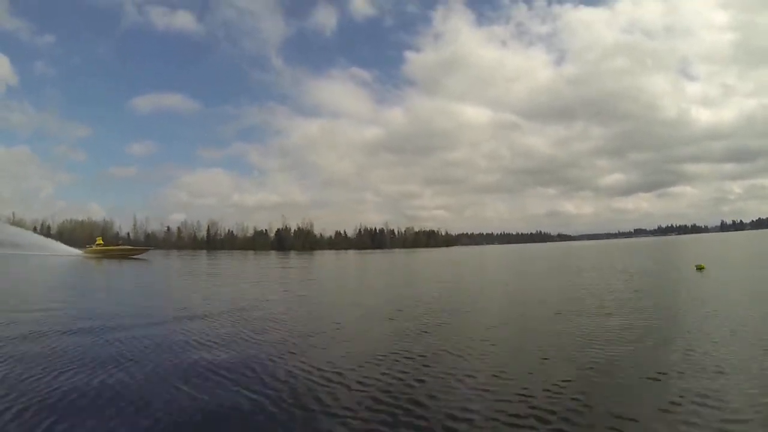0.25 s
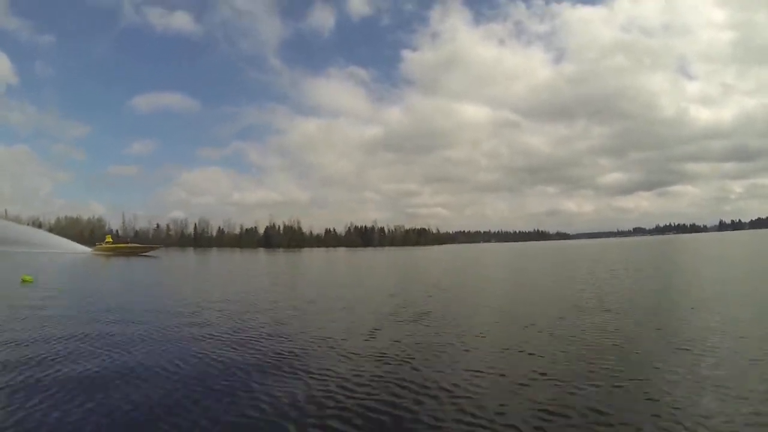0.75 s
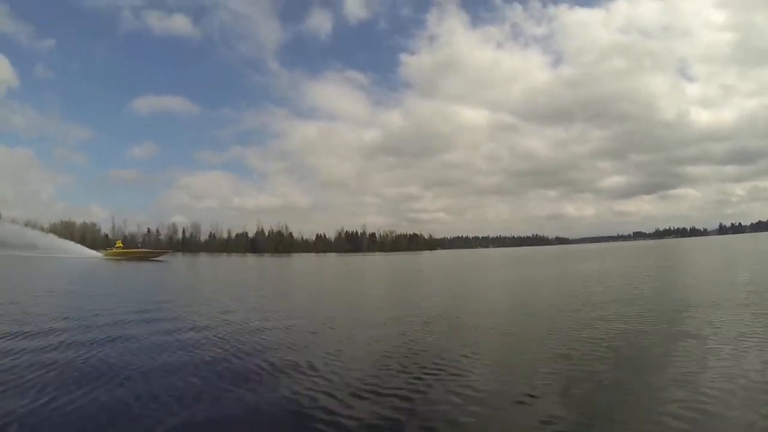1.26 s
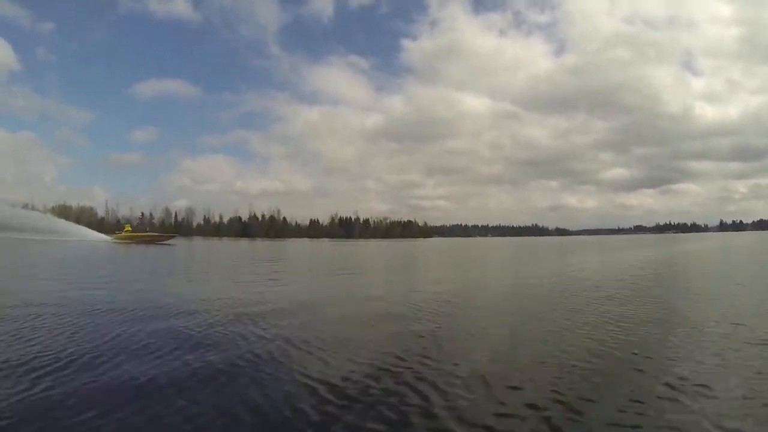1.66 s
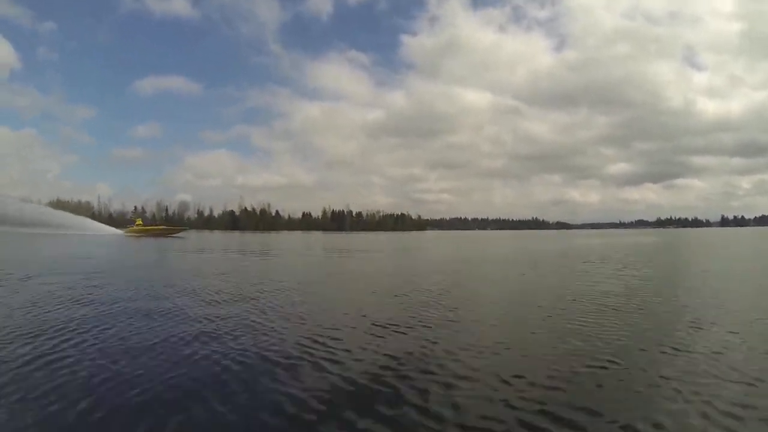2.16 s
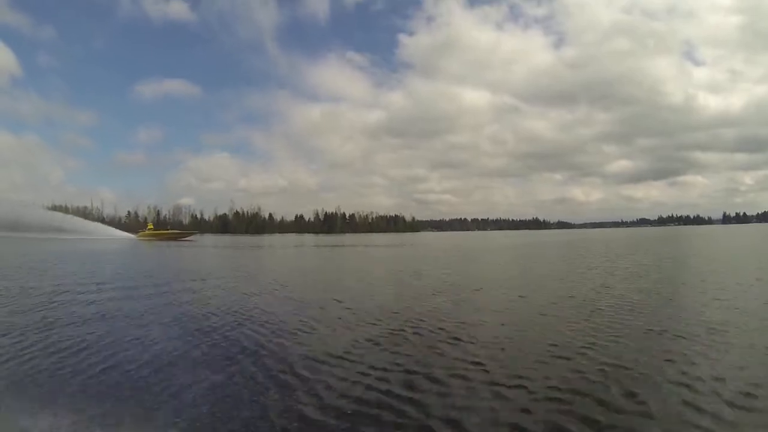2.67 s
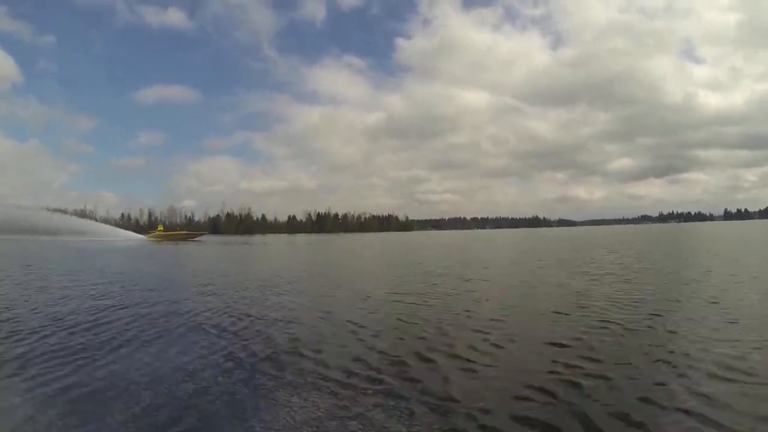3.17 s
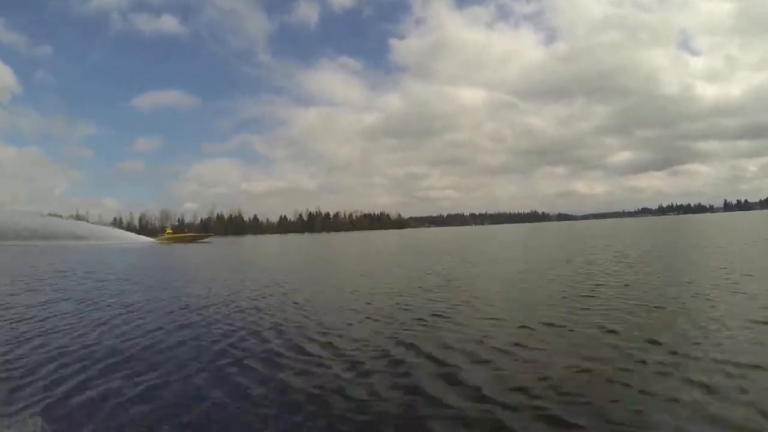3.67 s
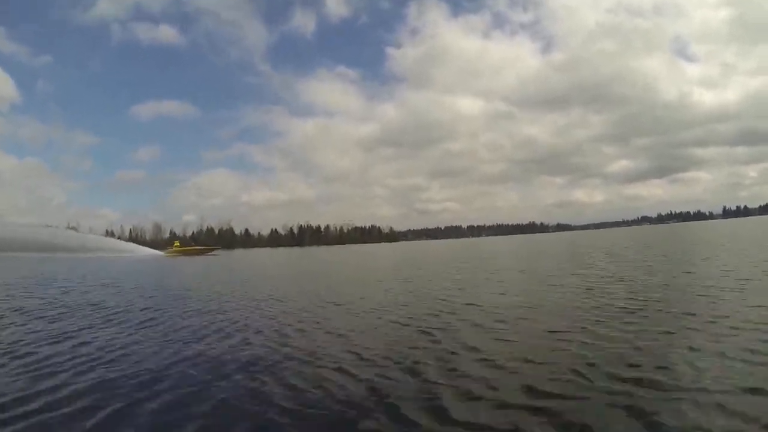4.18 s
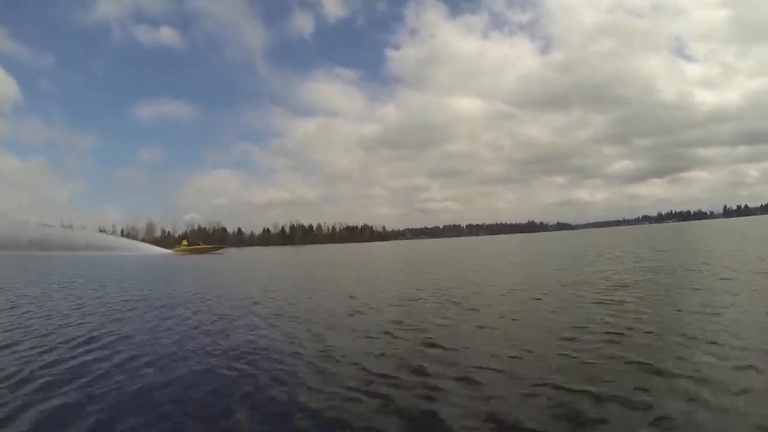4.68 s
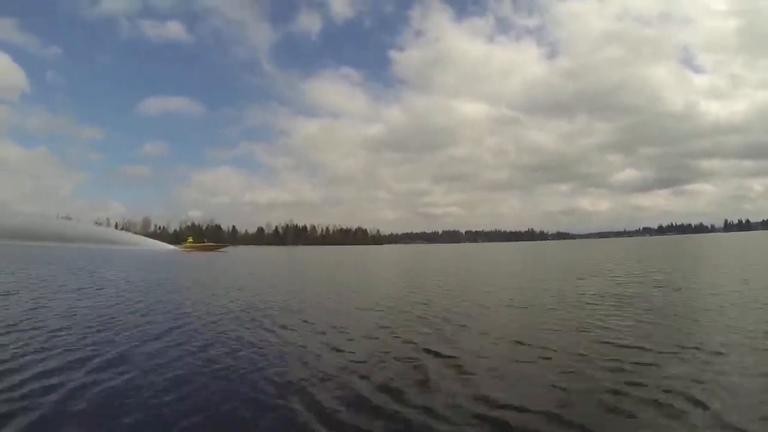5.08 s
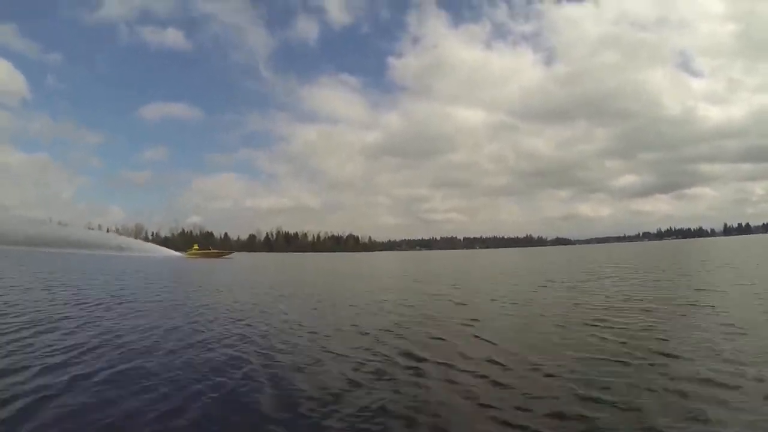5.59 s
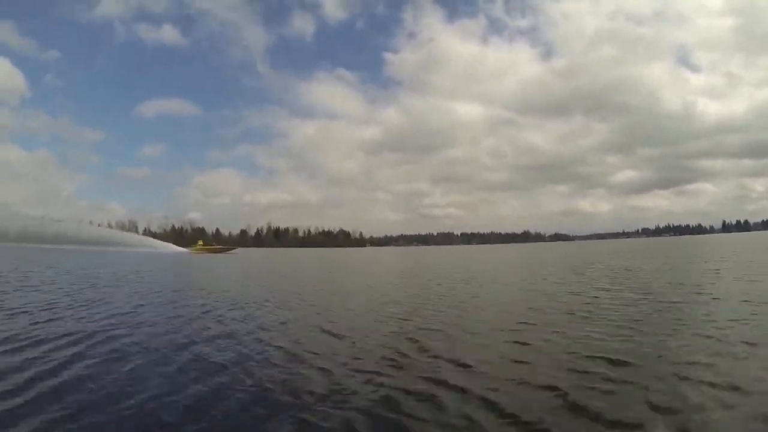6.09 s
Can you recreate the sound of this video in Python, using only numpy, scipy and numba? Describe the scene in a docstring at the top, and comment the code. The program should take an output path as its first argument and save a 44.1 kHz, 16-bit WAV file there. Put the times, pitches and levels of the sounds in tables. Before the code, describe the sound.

Aboard a fast boat on open water, a big engine holds one steady low drone, its raspy exhaust note wavering. Muffled water rushes beneath, swelling about twice a second as the hull bounces, with faint spray hiss. Low wind rumbles against the microphone's closed housing, and scattered hard gusts thump, briefly pushing everything else down.

```python
"""Jet boat at steady throttle

A V8 jet boat planes across a lake, heard by a small camera in a closed housing on board. Sine orders of the engine
cycle and resonant gas puffs make the drone; coloured noise makes the rushing water, spray and buffeting wind.
The hull bounces about twice a second: water and spray surge, and a loose fitting chatters in between.
Hard gusts thump and tick on the housing, and the loudest peaks make the gain control duck."""
import sys
import numpy as np
from scipy import signal
from scipy.fft import rfft, irfft, next_fast_len
from scipy.io import wavfile
from scipy.ndimage import uniform_filter1d
from numba import njit

SR = 44100
rng = np.random.default_rng(int(sys.argv[2]) if len(sys.argv) > 2 else 0)


def ratio(d):
    """dB to gain"""
    e = np.asarray(d, float) / 20
    return 10 ** e


def generate_wav(sig):
    """Save sig (samples, or channels by samples) to the path in sys.argv[1] as 16-bit PCM at SR."""
    pcm = np.round(np.clip(np.atleast_2d(sig).T, -1, 1) * 32767).astype(np.int16)
    wavfile.write(sys.argv[1], SR, pcm)


N = 279594
TIME = np.arange(N) / SR  # seconds

# Mean engine cycle rate, one cycle being two crank turns. Each row: time in seconds, rate in Hz.
CYCLE_RATE = [(0, 37.65), (2, 37.52), (3.5, 37.97), (5, 37.91), (6.34, 37.8)]
# Engine orders; 2 is the crank turn, 8 the firing. 1 and 4-6 hold a steady mean, the others ride on the curves below.
# Each row: multiple of the cycle rate, level in dB before a common lift.
ENGINE_ORDERS = [(1, -44), (2, 1.5), (3, -0.5), (4, -45), (5, -45.5), (6, -57.5), (7, -15.5), (8, 1),
                 (9, -11), (14, -14), (16, -9), (17, -12), (18, -5), (22, -14.5)]
# Exhaust pipe resonances, the main one first. Each row: centre in Hz, width in Hz, level in dB against its curve.
PIPE_RESONANCES = [(312.8, 39, -5), (653.5, 56, -4), (679, 100, -10.5), (853, 46, -10.5)]
# Levels of the low orders. Each row: time in seconds, throb (order 3) in dB, crank (order 2) in dB.
LOW_ORDER_LEVELS = [(0.03, -41, -38), (0.12, -40, -28), (0.47, -43, -45), (0.53, -36, -34.5), (0.66, -39, -27.5),
                    (0.8, -31, -39), (0.94, -41.5, -34), (1.02, -36.5, -43), (1.15, -41, -34.5),
                    (1.18, -40.5, -29), (1.43, -41, -34.5), (1.85, -35, -35.5), (1.92, -49.5, -32),
                    (2.05, -33, -36), (2.16, -45.5, -44), (2.35, -47, -27.5), (2.68, -43, -43), (2.79, -37, -29),
                    (2.88, -38, -46), (2.96, -34, -34), (3.12, -36, -41), (3.17, -41, -40), (3.31, -32.5, -35.5),
                    (3.57, -42, -28), (3.75, -52, -42), (3.89, -39, -27), (3.99, -47, -43), (4.1, -26, -32),
                    (4.19, -46, -36), (4.57, -33, -34.5), (4.64, -43, -27.5), (4.75, -36, -26), (4.8, -56, -57),
                    (4.83, -46, -42), (4.92, -36.5, -33.5), (5.2, -28.5, -38), (5.29, -56.5, -36),
                    (5.35, -35, -39), (5.44, -36.5, -31.5), (5.83, -46, -49), (5.91, -39, -35), (6.18, -35, -34),
                    (6.25, -37, -24.5), (6.3, -41, -42)]
# The firing note comes and goes as the outlet dips in and out of the wake. Each row: time in seconds, level in dB.
FIRING_LEVEL = [(0.03, -50), (0.06, -33.5), (0.47, -43), (0.62, -33.5), (0.64, -38), (0.78, -34),
                (0.82, -38.5), (1.04, -39), (1.08, -34), (1.29, -37), (1.32, -46), (1.36, -42), (1.53, -48),
                (1.74, -32), (1.81, -39.5), (1.95, -35.5), (2.0, -49.5), (2.11, -38), (2.12, -33.5),
                (2.37, -32.5), (2.46, -41.5), (2.51, -34), (2.54, -44), (2.61, -38.5), (2.65, -45.5),
                (2.82, -31), (3.15, -45.5), (3.17, -49.5), (3.4, -33.5), (3.49, -40), (3.68, -43.5),
                (3.96, -33), (4.01, -55), (4.05, -35), (4.12, -45), (4.15, -31.5), (4.26, -54), (4.29, -32),
                (4.38, -41), (4.48, -30.5), (4.76, -49), (4.82, -32), (4.85, -50), (4.88, -35.5),
                (4.95, -34), (5.01, -35.5), (5.08, -32.5), (5.11, -49), (5.15, -37), (5.34, -45),
                (5.53, -35.5), (5.91, -45.5), (6.0, -36.5), (6.3, -39)]
# Its overtones flare on their own. Each row: time in seconds, level in dB.
OVERTONE_LEVEL = [(0.03, -46), (0.13, -44.5), (0.17, -53), (0.24, -45), (0.36, -54), (0.59, -42),
                  (0.67, -48), (0.83, -42), (0.85, -47.5), (1.34, -47), (1.43, -54), (1.44, -50),
                  (1.58, -51), (1.62, -44), (1.72, -49), (1.79, -39.5), (1.85, -48), (1.95, -45.5),
                  (2.0, -51), (2.11, -48.5), (2.46, -44), (2.56, -58), (2.72, -47), (2.96, -45),
                  (3.19, -61), (3.3, -42.5), (3.68, -58), (3.89, -42.5), (3.9, -49), (4.06, -45),
                  (4.17, -57), (4.34, -46), (4.53, -47.5), (4.62, -45), (4.73, -57), (4.75, -59),
                  (4.92, -44.5), (4.95, -54), (5.02, -42), (5.08, -49), (5.11, -44.5), (5.29, -61),
                  (5.3, -49), (5.46, -46), (5.51, -48), (5.81, -52), (6.02, -44.5), (6.3, -56.5)]
# Crests of the hull's bounces. Each row: time in seconds, rushing water in dB, spray in dB, both before surges.
BOUNCE_CRESTS = [(-.4, -40, -43), (.1, -44.5, -58.5), (.62, -45.5, -58), (1.17, -45, -57.5),
                 (1.721, -44.5, -57.5), (2.251, -41.5, -55), (2.8, -45, -58.5), (3.361, -43.5, -57),
                 (3.9, -47, -58), (4.47, -43.5, -58.5), (5.001, -44.5, -58.5), (5.48, -46.5, -60.5),
                 (6.002, -43, -57), (6.55, -49, -63)]
# How deep the hull drops back after each crest. Each row: time in seconds, share of the sag depth.
DROP_SHARES = [(0, 1.1), (.4, 0.98), (.9, 0.63), (1.45, 1.39), (2.0, 0.52), (2.55, 0.85), (3.15, 1),
               (3.65, 1.3), (4.2, 0.82), (4.75, 0.66), (5.27, 0.71), (5.78, 0.52), (6.34, 1.1)]
# Short surges and lulls as the hull meets or clears a wave.
# Each row: middle in seconds, length at half height in seconds, water change in dB, spray change in dB.
WAVE_SURGES = [(0.862, 0.21, 1, 1.5), (1.084, 0.097, 3.5, 2.5), (1.294, 0.12, 3.5, 1.5),
               (2.187, 0.25, -4, -2.5), (2.43, 0.12, 1, 2), (2.587, 0.17, -4, -2.5), (2.716, .16, 2, 2.5),
               (2.98, 0.11, 1.5, 0.5), (3.2, 0.12, -6, -3.5), (3.3, .08, -1.5, -1), (3.86, 0.15, 3, 2.5),
               (3.93, 0.046, 1.5, -1), (4.053, 0.11, 5.5, 2.5), (4.16, 0.096, 0, -0.5), (4.457, 0.1, 1, 0),
               (4.816, 0.073, -0.5, 0.5), (5.105, 0.023, 2.5, 0), (5.19, .12, 1, 0.5), (5.427, 0.095, 3, 2),
               (5.907, 0.15, -3.5, -1.5), (6.044, 0.049, 2.5, 1), (6.224, 0.055, 3.5, 3)]
# Colour of the rushing water. Each row: frequency in Hz, relative density in dB per Hz.
WATER_COLOUR = [(250, -8.5), (500, 0.5), (800, -2.5), (1000, -5), (1170, -0.5), (1400, -2), (1750, -1.5),
                (2000, -20.5), (2600, -22)]
# Colour of the spray. Each row: frequency in Hz, relative density in dB per Hz.
SPRAY_COLOUR = [(1200, -29), (1900, -1), (2270, -10), (2700, -6), (3600, -10), (4250, -14.5), (4750, -15),
                (7150, -27.5), (10500, -31.5), (11200, -32), (12800, -35.5), (13300, -36.5), (13850, -28),
                (14200, -33.5), (14550, -46)]
# Modes of the housing's shell. Each row: centre in Hz, width in Hz, level in dB against the spray.
SHELL_MODES = [(3625, 86, -19), (4380, 82, -30), (6385, 45, -35.5), (6640, 50, -36), (8450, 200, -36)]
# Colour of the wind. Each row: frequency in Hz, relative density in dB per Hz.
WIND_COLOUR = [(12, 4), (30, 3), (60, 0.5), (120, -3.5), (250, -9.5), (360, -15), (480, -29.5),
               (800, -34.5), (2000, -60.5)]
# Wind on the housing. Each row: time in seconds, gain in dB.
WIND_GUSTS = [(0, -27.5), (.6, -28.5), (1.05, -26), (1.6, -28.5), (2.2, -28), (2.85, -28), (3.3, -31.5),
              (3.9, -27), (4.5, -28), (5.0, -28.5), (5.5, -28), (6.0, -26), (6.34, -29)]
# Hard gusts. Each row: time in seconds, peak in dB, push (+1) or suction (-1), length in seconds.
HARD_GUSTS = [(0.642, -13, 1, 0.009), (1.331, -18, 1, 0.0069), (1.979, -6.5, -1, 0.008),
              (2.483, -16.5, 1, 0.0089), (2.545, -14, -1, 0.0096), (2.790, -16, -1, 0.0035),
              (3.007, -18.5, -1, 0.0055), (3.101, -17, -1, 0.0045), (3.16, -17.5, 1, 0.0094),
              (3.457, -12.5, -1, 0.0053), (3.618, -14, 1, 0.004), (4.045, -15.5, 1, 0.0029),
              (4.423, -14, -1, 0.0028), (4.655, -17, 1, 0.0041), (4.727, -7, -1, 0.0068),
              (4.962, -15.5, -1, 0.0057), (5.254, -10.5, -1, 0.0063), (5.688, -16, 1, 0.014),
              (6.117, -16, -1, 0.0057)]
# Swells of chatter. Each row: middle in seconds, length in seconds, lowest mode in dB, other modes in dB.
CHATTER_SWELLS = [(0.312, 0.3, -83, -81), (0.842, 0.3, -73, -76.5), (1.382, 0.44, -89, -86),
                  (1.92, 0.26, -73, -80), (2.5, 0.24, -79, -84), (3.028, 0.34, -82, -76.5),
                  (3.543, 0.56, -78, -85), (4.1, 0.41, -79, -78), (4.618, 0.56, -76, -79.5),
                  (5.16, 0.41, -79, -80.5), (5.715, 0.59, -84, -80), (6.218, 0.71, -88, -82)]
# Modes of the loose fitting. Each row: frequency at rest in Hz, level in dB against the swell, t60 in seconds.
FITTING_MODES = [(9290, -8, .018), (9530, -2, .02), (9760, -4, .018), (9740, 0.5, .018)]
# Colour of the camera's hiss. Each row: frequency in Hz, relative density in dB per Hz.
HISS_COLOUR = [(3000, -3), (6000, 4.5), (10000, 1), (14600, -5)]


def curves(table):
    """Linear interpolation: the columns of a table at every sample."""
    s, *columns = np.transpose(table)
    return [np.interp(TIME, s, c) for c in columns]


def unit(x):
    """Normalization to rms 1."""
    return x / np.sqrt(np.mean(x ** 2))


def walk(rate):
    """Smoothed random steps: levels held 1 / rate seconds and slewed twice, with rms 1."""
    k = int(SR / rate)
    steps = np.repeat(rng.standard_normal(N // k + 1), k)
    return unit(uniform_filter1d(uniform_filter1d(steps, k), k)[:N])


def turbulence(spectrum, shared_db, own_db, rate):
    """Modulated noise: half-octave bands of one colour all follow shared_db and each also flutters alone."""
    hz, db = np.transpose(spectrum)
    size = next_fast_len(N)
    octave = np.log2(np.maximum(np.fft.rfftfreq(size, 1 / SR), 1))
    gain = ratio(np.interp(octave, np.log2(hz), db, left=-150, right=-150))
    coloured = gain * rfft(rng.standard_normal(size))
    out = 0
    for centre in np.arange(np.log2(hz[0]), np.log2(hz[-1]) + .5, .5):
        band = irfft(coloured * np.clip(1 - 2 * abs(octave - centre), 0, 1), size)[:N]
        out = out + band * ratio(own_db * walk(rate))
    return unit(out * ratio(shared_db))


def ring(x, hz, width_hz):
    """Two-pole resonance with gain 1 at its centre."""
    return signal.lfilter(*signal.iirpeak(hz, hz / width_hz, SR), x)


def engine():
    """Harmonic orders of a periodic source: the low ones rise and fall on their own curves, the rest leave by
    the resonant exhaust."""
    phase = np.cumsum(curves(CYCLE_RATE)[0] * (1 + .002 * walk(6))) / SR  # in cycles
    throb_db, crank_db = curves(LOW_ORDER_LEVELS)
    # water washing over the outlet breaks the exhaust into uneven bursts
    note_db = curves(FIRING_LEVEL)[0] + 1.5 * walk(28)
    overtones_db = curves(OVERTONE_LEVEL)[0] + 1.6 * walk(30)
    lift_db = 1.83
    out = 0
    for multiple, db in ENGINE_ORDERS:
        if multiple == 2:
            carrier_db = crank_db
        elif multiple == 3:
            carrier_db = throb_db
        elif multiple < 7:
            carrier_db = 0
        else:
            carrier_db = note_db if multiple < 10 else overtones_db
        # uneven burns let each order waver on its own
        level = ratio(lift_db + db + carrier_db + 1.0 * walk(7.6))
        jitter = (0.054 + 0.041 * multiple) * walk(14)  # radians
        out = out + level * np.sin(2 * np.pi * (multiple * phase + rng.random()) + jitter)
    gas = rng.standard_normal(N) * np.exp(-(8 * phase % 1) / 0.24)  # one puff a firing
    for hz, width_hz, db in PIPE_RESONANCES:
        carrier_db = note_db if hz < 500 else overtones_db
        out = out + ratio(db + carrier_db) * unit(ring(ring(gas, hz, width_hz), hz, width_hz))
    return out


def sag(lead_s):
    """Periodic heave: 0 on the crest of a bounce, strongest about midway between two crests."""
    s = np.transpose(BOUNCE_CRESTS)[0]
    bounce = np.interp(TIME + lead_s, s, np.arange(len(s)))
    return -curves(DROP_SHARES)[0] * np.sin(np.pi * bounce) ** 2


def surges():
    """Raised-cosine level changes in dB of water and spray on meeting or clearing a wave."""
    middle, length, *db = np.transpose(WAVE_SURGES)[:, :, None]
    shape = np.cos(np.pi * np.clip((TIME - middle) / (2 * length), -.5, .5)) ** 2
    return [(d * shape).sum(axis=0) for d in db]


def bubbles():
    """Resonance of air pockets in the wake: short rings in clumps, each size with its own pitch."""
    out, clumps = 0, ratio(3.1 * walk(13))
    for hz in np.geomspace(720, 1850, num=24):
        pops = rng.standard_normal(N) * (rng.random(N) < 11 / SR) * clumps  # about 11 a second per size
        out = out + unit(ring(ring(pops, hz, hz / 9), hz, hz / 36))
    return unit(out)


def water(level_db, slap, patter, crackle):
    """Turbulent flow past the hull as fluctuating noise, with bubble resonances beneath it."""
    rush = turbulence(WATER_COLOUR, 0.72 * slap + 0.65 * patter + 0.55 * crackle, 0.37, 30)
    return ratio(level_db) * rush + ratio(level_db - 9.5) * bubbles()


def shell():
    """Forced resonance: noise rings the narrow modes of the housing's shell."""
    out = 0
    for hz, width_hz, db in SHELL_MODES:
        noise = rng.standard_normal(N)
        out = out + ratio(db) * unit(ring(ring(noise, hz, width_hz), hz, width_hz))
    return out


def spray(level_db, slap, patter, crackle):
    """Many small impacts as fluctuating noise; the shell rings faintly at the spray's level."""
    hiss = turbulence(SPRAY_COLOUR, 0.5 * slap + 0.71 * patter + 0.92 * crackle, 0.41, 30)
    return ratio(level_db) * (hiss + shell())


def evened(x, hz):
    """Partial compression: the housing's soft seal pulls swings below hz toward a steady size."""
    evenness = 0.45  # 0 none, 1 strongest
    low = signal.filtfilt(*signal.butter(2, hz, fs=SR), x)
    size = np.sqrt(uniform_filter1d(low ** 2, size=2600) / np.mean(low ** 2) + 0.055)
    return x - low + low * size ** -evenness


def wind(slap):
    """Turbulent pressure on the housing: low noise with slow gusts and faster buffeting."""
    shared_db = 0.24 * walk(2.9) + 1.1 * walk(16) + 0.25 * slap
    return ratio(curves(WIND_GUSTS)[0]) * evened(turbulence(WIND_COLOUR, shared_db, 0.9, 12), 61.0)


def thumps():
    """Pressure pulse: each hard gust is one smooth swing with a smaller, slower rebound."""
    rebound = 0.12  # share of the swing that comes back
    out = np.zeros(N)
    for s, db, direction, length in HARD_GUSTS:
        u = (TIME - s) / length * 4  # the length spans four standard deviations
        swing = np.exp(-u ** 2 / 2) - rebound * np.exp(-((u - 3) / 3) ** 2 / 2)
        out += np.sign(direction) * ratio(db) * swing
    return out


def ticks():
    """Broad resonance under brief excitation: a noise click on the housing at each hard gust."""
    against_thump_db, decay_s = -49, 0.0015
    out = np.zeros(N)
    for s, db, _, _ in HARD_GUSTS:
        out += ratio(db + against_thump_db) * np.exp(-np.clip(abs(TIME - s) / decay_s, 0, 50))
    return out * unit(ring(rng.standard_normal(N), 5000., 7000.))


def chatter():
    """Modal ringing: random taps buzz a loose fitting in swells, and its modes sink in pitch under load."""
    middle, length, lowest_db, others_db = np.transpose(CHATTER_SWELLS)[:, :, None]
    lowest_share, glide_hz = 0.86, 150  # part of a swell with the lowest mode; fall at a swell's peak

    def swell(share):
        """Raised-cosine rise and fall over a share of each swell's length."""
        return np.cos(np.pi * np.clip((TIME - middle) / (length * share), -.5, .5)) ** 2

    whole = swell(1)
    sink = np.cumsum(whole.sum(axis=0)) * glide_hz / SR  # in cycles
    lowest = (ratio(lowest_db) * swell(lowest_share)).sum(axis=0)
    others = (ratio(others_db) * whole).sum(axis=0)
    out = 0
    for hz, db, t60 in FITTING_MODES:
        # about 900 taps a second, each with random strength and phase
        taps = (rng.standard_normal(N) + 1j * rng.standard_normal(N)) * (rng.random(N) < 900 / SR)
        fade = np.exp(-np.log(1000) / (t60 * SR))
        softened = signal.lfilter([1], [1, -fade ** 4], taps)
        rings = signal.lfilter([1], [1, -fade], softened)
        strength = (lowest if hz < 9520 else others) * ratio(1.8 * walk(30))
        tone = (rings * np.exp(2j * np.pi * (hz * TIME - sink))).real
        out = out + ratio(db) * strength * unit(tone)
    return out


def scene():
    """Superposition of everything that reaches the housing."""
    water_crest_db, spray_crest_db = curves(BOUNCE_CRESTS)
    water_surge_db, spray_surge_db = surges()
    # sag depths 2 and 2.5 dB; the spray runs a little ahead
    water_db = water_crest_db + 2 * sag(lead_s=0.022) + water_surge_db
    spray_db = spray_crest_db + 2.5 * sag(lead_s=0.048) + spray_surge_db
    # the hull skipping over ripples shakes water and spray alike
    slap, patter, crackle = walk(24.17), walk(70), walk(320)
    wet = water(water_db, slap, patter, crackle) + spray(spray_db, slap, patter, crackle)
    return (engine() + wet + wind(slap) + thumps() + ticks() + chatter())[None]


@njit
def gain_control(x, top, attack, release):
    """Peak limiting: follows peaks quickly, lets go slowly, and turns everything down above top."""
    y, e = np.empty(len(x)), 0.
    for i in range(len(x)):
        e += (abs(x[i]) - e) * (attack if abs(x[i]) > e else release)
        y[i] = x[i] * top / max(e, top)
    return y


def hiss():
    """Electronic noise of the camera as faint coloured noise."""
    return ratio(-87.5) * turbulence(HISS_COLOUR, 0, .8, 30)


def top_cut(x):
    """Nothing passes above the cut-off."""
    return signal.sosfilt(signal.butter(12, 14630, fs=SR, output="sos"), x)


def record(dry):
    """Transduction: the microphone trims the deepest bass, gain control ducks after hard peaks, hiss is added."""
    mic = signal.lfilter(*signal.butter(1, 23.5, "high", fs=SR), dry[0])
    attack_s, release_s = 0.0024, 0.1
    ducked = gain_control(mic, ratio(-21.5), 1 / (attack_s * SR), 1 / (release_s * SR))
    fade = np.clip(np.minimum(TIME, TIME[::-1]) / .003, 0, 1)  # 3 ms at both ends
    mix = (ducked + hiss()) * fade
    return top_cut(mix[None])


dry = scene()
out = record(dry)
generate_wav(out)
```